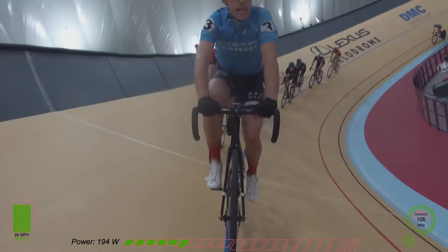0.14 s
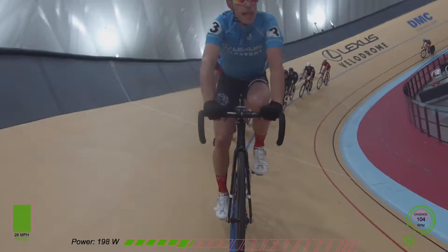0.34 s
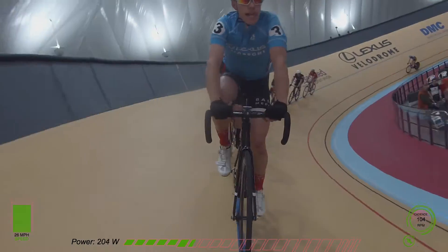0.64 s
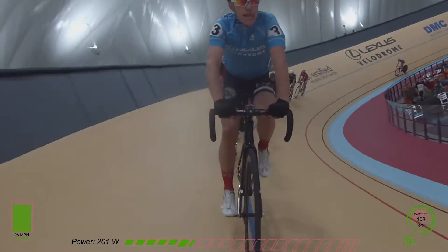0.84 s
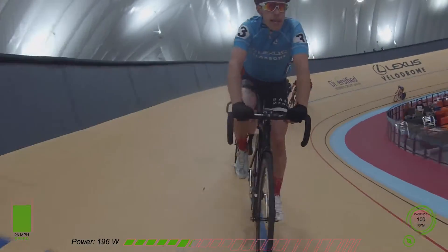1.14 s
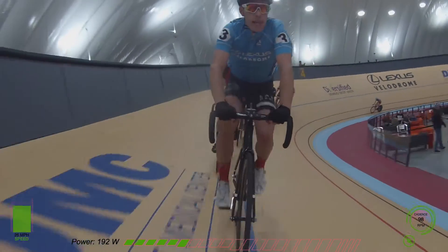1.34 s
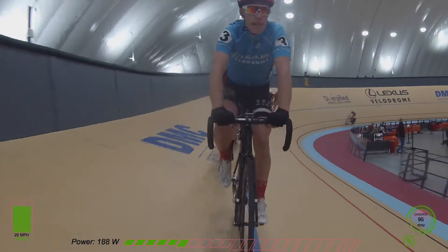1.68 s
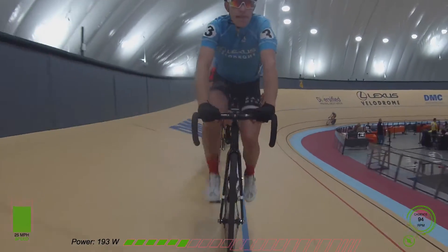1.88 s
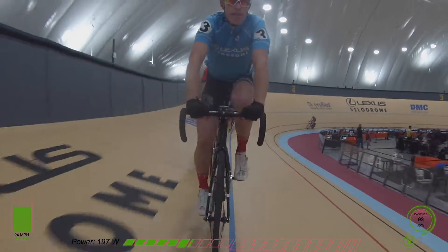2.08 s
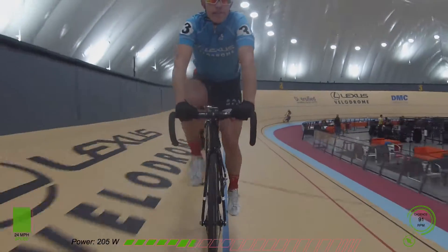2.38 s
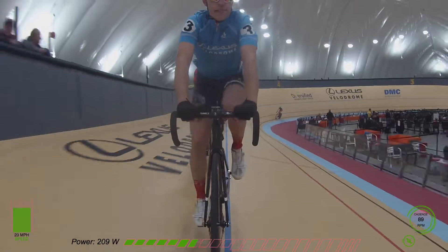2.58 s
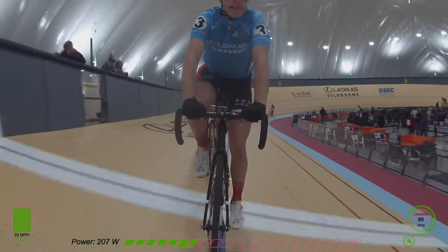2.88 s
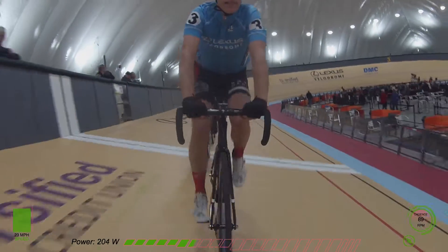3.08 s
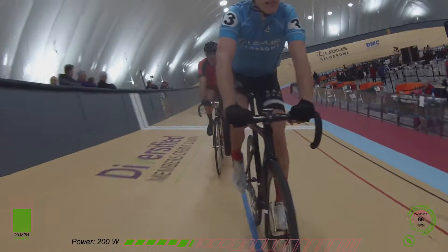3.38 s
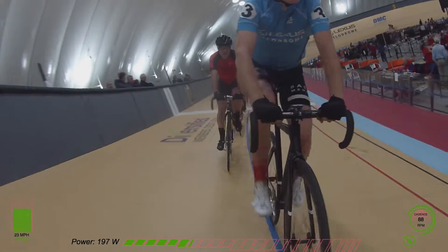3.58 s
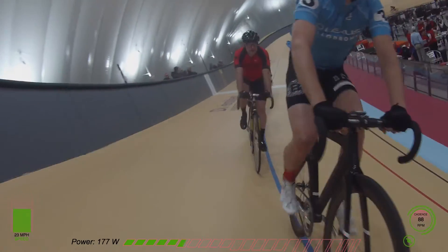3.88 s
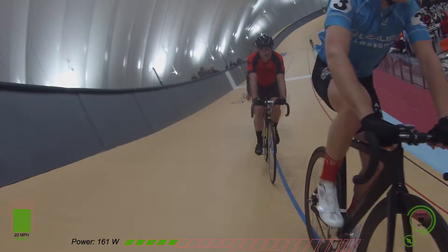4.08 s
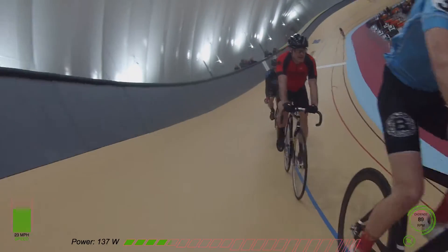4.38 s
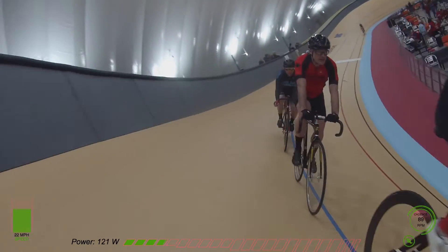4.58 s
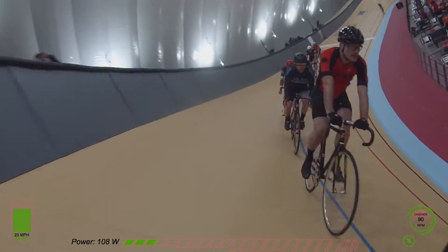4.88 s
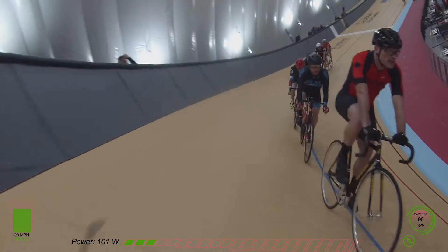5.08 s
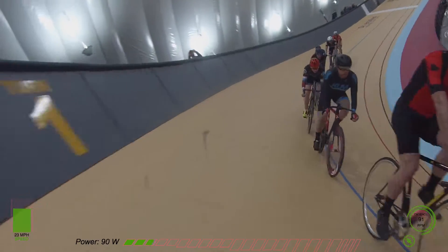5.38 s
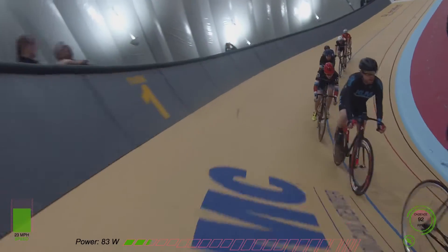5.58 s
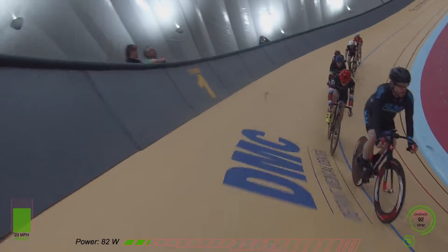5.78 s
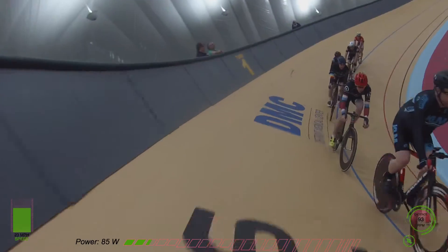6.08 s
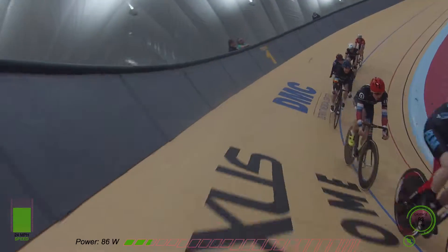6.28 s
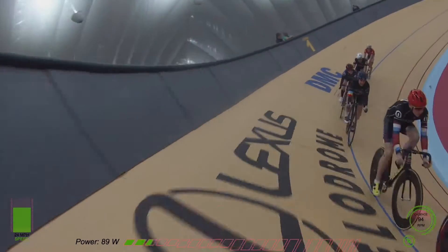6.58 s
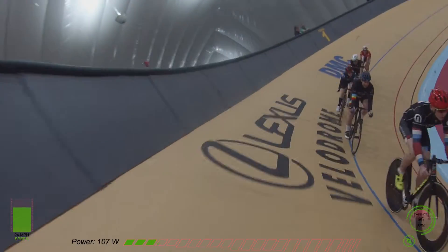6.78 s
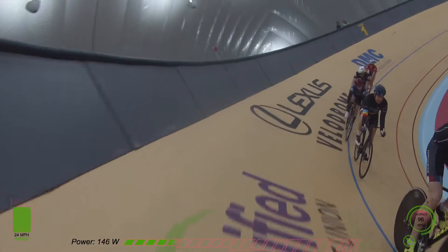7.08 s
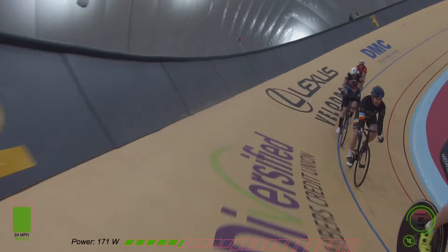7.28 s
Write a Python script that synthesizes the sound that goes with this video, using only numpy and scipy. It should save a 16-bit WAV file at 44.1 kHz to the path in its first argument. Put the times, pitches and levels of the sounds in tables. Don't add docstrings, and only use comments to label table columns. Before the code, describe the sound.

Close to a track bike's frame, rapid chain links ring in a rough buzz that slowly drops, under buffeting wind and steady tyre roar.

```python
import sys
import numpy as np
from scipy import signal
from scipy.fft import rfft, irfft, next_fast_len
from scipy.io import wavfile
from scipy.ndimage import uniform_filter1d, minimum_filter1d, map_coordinates

SR = 44100
rng = np.random.default_rng(int(sys.argv[2]) if len(sys.argv) > 2 else 0)


def log_audio(samples):
    frames = np.atleast_2d(samples).T
    limited = np.clip(frames, -1, 1)
    pcm = np.round(limited * 32767).astype(np.int16)
    wavfile.write(sys.argv[1], SR, pcm)


def boost(x):
    u = np.asarray(x, float) / 20
    return 10 ** u


N = 328545

# (frequency [Hz], level per Hz [dB])
TYRE_ROAR = [(250, -13.5), (500, -6), (800, -0.5), (1040, -1), (1200, -7), (1500, -10), (3000, -20),
             (8000, -39), (15000, -70)]
# (frequency [Hz], level per Hz [dB])
WIND_BUFFET = [(9, -39), (15, -2), (43, 0.5), (95, -0.5), (150, -9), (260, -23.5), (600, -80)]
# (frequency [Hz], level per Hz [dB])
WIND_FLUTTER = [(60, -45), (130, 0), (220, -4.5), (350, -11.5), (550, -17), (900, -28.5), (2000, -70)]
# (time [s], half length [s], buffet rise [dB], flutter rise [dB])
LEG_GUSTS = [(0.21, 0.075, 5.5, 6.5), (0.52, 0.021, 9, -3.5), (0.624, 0.018, -5, 10),
             (0.87, 0.11, 9.5, 10.0), (1.075, 0.19, 4, 7), (1.474, 0.029, 3, 4.2), (1.583, 0.051, 8, -2.5),
             (1.708, 0.038, 7, 8.5), (1.976, 0.077, 6, 8), (2.316, 0.088, 5.7, 6.5),
             (2.53, 0.078, 7.5, 9.8), (2.75, 0.057, 10, 4), (2.9, 0.06, 7, 11.5), (3.059, 0.021, 10, 5),
             (3.203, 0.17, 5.5, 7.5), (3.435, 0.038, 10.5, 2), (3.695, 0.15, 6, 8), (4.06, 0.042, 7.5, 4),
             (4.304, 0.067, 8.5, 7.5), (4.703, 0.049, 5, 10.5), (4.764, 0.011, 2, 9),
             (4.934, 0.13, 9.5, 8.5), (5.325, 0.047, 5, 2), (5.576, 0.031, -1, 2), (5.687, 0.025, -3, 4.5),
             (5.96, 0.058, 7, 8.5), (6.446, 0.03, 8, 1), (6.73, 0.13, 2.7, 4.5), (6.962, 0.071, 3, 2.5),
             (7.438, 0.047, 6.5, 0.5)]
# (time [s], half length [s], drop [dB])
WIND_LULLS = [(0.084, 0.1, 2.2), (0.414, 0.045, 4.9), (0.965, 0.026, 9), (1.9, 0.034, 3.1),
              (2.198, 0.022, 1), (2.59, 0.031, 2), (3.28, 0.066, 6), (3.585, 0.043, 5.5), (3.848, 0.025, 1),
              (4.27, 0.021, 12), (4.54, 0.067, 5), (4.851, 0.079, 8.5), (5.09, 0.021, 8),
              (5.203, 0.025, 3.6), (6.151, 0.068, 1), (6.758, 0.039, 4.5), (7.287, 0.016, 2)]
# (time [s], peak [dB], thump over peak [dB])
SHARP_PUFFS = [(0.193, -14, 7), (0.233, -9, -10), (0.293, -15, 3), (0.602, -13, -2), (0.789, -17, -6),
               (0.822, -6, -1), (0.884, -9, -1), (1.074, -9, -5), (1.39, -14.5, -14), (1.451, -12.5, 0),
               (1.535, -12, -1), (1.988, -11, -12), (2.467, -5.5, 3.5), (2.538, -11.5, 1),
               (2.659, -12, -12), (2.877, -29, 0), (2.919, -8.5, 7.5), (3.081, -27, -8), (3.127, -9, -13),
               (3.2, -7.5, -4), (3.434, -13, -20), (3.738, -13, 1), (4.19, -22, 7), (4.297, -15, -6),
               (4.758, -18, 14), (4.916, -10.5, 0.5), (5.225, -16.5, 2), (5.525, -20, -11),
               (6.307, -14, -4), (6.462, -16.5, 6)]
# (frequency [Hz], level [dB])
PUFF_AIR = [(80, -3), (200, 2.0), (400, 0.5), (900, -5.5), (1300, -25.0), (3000, -54)]
# (time [s], peak [dB], frequency [Hz], time to fade 60 dB [s])
CLAMP_KNOCKS = [
    (2.0585, -16, 3000, .045),
    (4.536, -15, 2500, .02),
    (7.0167, -9, 2500, .011),
    (7.0172, -13, 3150, .011),
]
# (time [s], links passed [count])
CHAIN_TRAVEL = [(0.0, -0.47), (0.45, 38.1), (1.05, 90.37), (1.8, 156.88), (2.4, 209.6), (3.0, 262.02),
                (3.6, 313.73), (4.05, 351.83), (4.2, 364.08), (4.35, 376.11), (4.8, 411.79), (5.4, 457.67),
                (5.85, 490.69), (6.0, 501.97), (6.75, 557.05), (6.9, 567.8), (7.2, 590.16), (7.45, 609.09)]
# (time [s], rollers peak [dB], frame peak [dB], mount peak [dB])
HARD_LINKS = [(0.0145, -30, -19.5, -22), (0.4348, -27, -17, -19), (0.5275, -27, -13, -33),
              (0.79, -27, -15, -17.5), (1.1796, -26, -12, -19.5), (1.224, -25.5, -26, -19),
              (1.3705, -29, -19, -20), (1.6888, -26, -16, -19), (1.745, -30, -13, -21),
              (1.8096, -33, -13, -17), (1.971, -28, -21, -19), (2.051, -33, -11, -20),
              (2.1893, -30, -16, -20), (2.381, -30, -21, -18.5), (2.4587, -25, -21, -15.5),
              (3.4058, -29, -16, -21), (3.5896, -22, -20, -20), (3.9108, -27, -17.5, -25),
              (3.9455, -29, -12, -25), (4.2336, -29, -15.5, -24), (4.381, -29, -16, -22),
              (4.5343, -28, -15, -23), (5.1408, -28, -14, -19), (5.3364, -24, -22, -18),
              (5.5251, -29, -17, -22), (5.688, -32, -17, -20), (5.946, -33, -10.5, -18),
              (6.2452, -33, -14, -26), (6.7197, -25, -34, -24), (7.38, -25, -20, -17.5)]
# (time [s], half length [s], slack [dB], surge after it [dB])
CRANK_DEAD_SPOTS = [(0.122, 0.077, 4, 4), (0.321, 0.031, 11, 8), (0.43, 0.077, 14.5, 7),
                    (0.7, 0.05, 3.5, 3.5), (1.026, 0.029, 6, 3.5), (1.32, 0.03, 6, 1.2),
                    (1.566, 0.02, 5.2, -0.8), (1.88, 0.062, 5.5, 3.3), (2.151, 0.032, 9.5, 4.5),
                    (2.423, 0.065, 3.5, 0.5), (2.565, 0.046, 12, 8.5), (2.718, 0.079, 11.5, 10),
                    (3.06, 0.029, 7, 2.2), (3.382, 0.015, 4, 4.5), (3.548, 0.05, 6.5, 3),
                    (3.87, 0.022, 10, 2), (4.15, 0.044, 2.5, 0), (4.468, 0.038, 8, 3),
                    (4.78, 0.054, 4, 2.5), (4.899, 0.011, 11, -1), (5.1, 0.03, 4.9, 0),
                    (5.442, 0.051, 4.5, 0.5), (5.733, 0.037, 8.5, -1), (6.055, 0.052, 9, -3),
                    (6.277, 0.062, 3.5, 2.2), (6.476, 0.12, 5, 1), (6.785, 0.053, 6, 1.5),
                    (7.09, 0.06, 7.5, -0.5), (7.26, 0.08, 3, 2.3)]
# (frequency [Hz], width [Hz], level [dB])
FRAME_TUBES = [(1696, 85, -5), (1895.8, 31.5, 5.5), (2109, 53, 2), (2198, 226, -5)]
# (frequency [Hz], width [Hz], level [dB])
CAMERA_MOUNT = [(2676, 94, 0.5), (3132, 62, -0.5), (3316, 61, -4), (3818, 150, 1.5), (4176, 107, 1.5),
                (4454, 55, -1), (4720, 133, -7), (4964, 130, -7), (5330, 39, -7.5), (5520, 155, -11.5),
                (5950, 54, -8), (6190, 69, -6), (7020, 160, -17.5), (7640, 100, -18.5)]
# (frequency [Hz], width [Hz], level [dB])
CHAIN_ROLLERS = [(8410, 86, 7.5), (8820, 210, 11), (9700, 210, 3), (10020, 108, 11.5), (10650, 120, -4)]
# (frequency [Hz], width [Hz], level [dB])
CHAIN_PINS = [(11000, 400, -2), (11830, 100, 2), (12170, 130, 5), (12520, 90, 9), (12950, 150, 5),
              (13450, 300, 0), (14450, 400, -1), (14900, 300, 3)]
# (frequency [Hz], level [dB])
MIC_PORT = [(20, -1), (5000, 0.5), (9000, -2.5), (10500, -5.5), (12500, -12.5), (13900, -21), (15500, -31)]
# (time [s], gain [dB])
AUTO_GAIN = [(0.0, 1.5), (0.8, -0.7), (0.92, -4.5), (1.07, -4), (1.37, 1.04), (2.07, -0.6), (2.52, 0.2),
             (2.57, -7.5), (2.77, -7), (3.07, -3), (3.77, -1), (4.09, 1.8), (4.67, -0.05), (5.09, -2.5),
             (5.5, 2.1), (5.97, 2.6), (6.27, 1.1), (7.45, 1.5)]


def unit(x):
    return x / np.sqrt(np.mean(x ** 2) + 1e-20)


def along(points, hz):
    f, v = np.transpose(points)
    return np.interp(np.log(hz + 1), np.log(f + 1), v)


def wobble(rate):
    points = rng.standard_normal(int(N * rate / SR) + 4)
    return map_coordinates(points, [np.arange(N) * rate / SR])


def filtered(x, response):
    m = next_fast_len(N + SR // 2)
    return irfft(rfft(x, m) * response(np.fft.rfftfreq(m, 1 / SR)), m)[..., :N]


def noise(spectrum):
    return unit(filtered(rng.standard_normal(N), lambda hz: boost(along(spectrum, hz))))


def ringing(x, modes):
    def body(f):
        total = 0
        for k, (centre, width, db) in enumerate(modes):
            damping = 1j * f * width
            total = total + (-1) ** k * boost(db) * damping / (centre ** 2 - f ** 2 + damping)
        return total
    return unit(filtered(x, body))


def bell(t, length):
    return np.exp(-(t / length) ** 2)


def summed(shape, at, db):
    t = np.arange(0, N / SR, 1 / 1000)
    return np.interp(np.arange(N) / SR, t, shape(t[:, None] - at) @ db)


def gusts():
    s, length, buffet_db, flutter_db = np.transpose(LEG_GUSTS)
    lull_s, lull_length, lull_db = np.transpose(WIND_LULLS)
    lull = summed(lambda t: bell(t, lull_length), lull_s, lull_db)
    buffet_swing = summed(lambda t: bell(t, length), s, buffet_db) - lull
    flutter_swing = summed(lambda t: bell(t, length), s, flutter_db) - lull
    return buffet_swing, flutter_swing


def tyres(flutter_swing, eddy):
    roar = unit(boost(0.15 * eddy + 1.8 * wobble(40)) * noise(TYRE_ROAR))
    level_db = -29 + 0.31 * np.maximum(flutter_swing, 0)
    return boost(level_db + 0.02) * roar


def wind(buffet_swing, flutter_swing, eddy):
    buffet = unit(boost(0.6 * eddy + 1.0 * wobble(30)) * noise(WIND_BUFFET))
    flutter = unit(boost(2.65 * eddy + 1.33 * wobble(35)) * noise(WIND_FLUTTER))
    buffet_db, flutter_db = -19 + buffet_swing, -27 + flutter_swing
    return boost(buffet_db + 0.6) * buffet + boost(flutter_db + 1.0) * flutter


def puffs():
    swell, push = np.zeros(N + SR), np.zeros(N + SR)
    t = np.arange(SR // 10) / SR
    sides = np.sign(rng.standard_normal(len(SHARP_PUFFS)))
    for (s, db, thump_db), side in zip(SHARP_PUFFS, sides):
        start = round(s * SR)
        thump = np.sin(2 * np.pi * 85 * t) * bell(t, 0.012)
        swell[start:][:len(t)] += boost(db - 6.5) * t / 0.0086 * np.exp(1 - t / 0.0078)
        push[start:][:len(t)] += side * boost(db + thump_db + 3.5) * thump
    return swell[:N] * noise(PUFF_AIR) + push[:N]


def knocks():
    out = np.zeros(N + SR)
    t = np.arange(SR // 20) / SR
    bent_time = t + 0.00015 * (1 - np.exp(-t / 0.002))
    for s, db, hz, t60 in CLAMP_KNOCKS:
        strength = boost(db - 60 * t / t60) * (1 - np.exp(-t / 0.0006))
        out[round(s * SR):][:len(t)] += strength * np.sin(2 * np.pi * hz * bent_time)
    return out[:N]


def pull():
    s, length, slack_db, surge_db = np.transpose(CRANK_DEAD_SPOTS)

    def surge(t):
        after = np.maximum(t, 0) / 0.046
        return after * np.exp(1 - after)

    return summed(surge, s, surge_db) - summed(lambda t: bell(t, length), s, slack_db)


def blows(spot, hard, db, hard_db, load_db):
    db = np.where(np.isin(np.arange(len(spot)), hard), 0, db)
    db[hard] = hard_db - load_db[spot[hard]]
    return np.bincount(spot, boost(db), N)[:N]


def scrape(clicks, rise, life, slide_db, tap_db):
    t = np.arange(SR // 40) / SR
    burst = signal.fftconvolve(clicks, (1 - np.exp(-t / rise)) * np.exp(-t / life))[:N]
    rough = rng.standard_normal(N)
    contact = (unit(np.abs(burst)) + boost(slide_db)) * rough
    return contact + boost(tap_db) * unit(clicks) * np.sign(rough)


def chain(flutter_swing):
    load_db = pull()
    frame_db = -26.5 + load_db
    mount_db = -31.5 + 0.55 * load_db + 0.05 * flutter_swing
    roller_db = -47 + 0.77 * load_db

    at, passed = np.transpose(CHAIN_TRAVEL)
    link = np.arange(int(passed[-1]) + 1)
    luck = rng.standard_normal((len(link), 4))
    when = np.interp(link - 0.2, passed, at) + 0.00076 * luck[:, 0]
    hard_s, hard_roller_db, hard_frame_db, hard_mount_db = np.transpose(HARD_LINKS)
    hard = np.abs(when[:, None] - hard_s).argmin(axis=0)
    when[hard] = hard_s
    spot = (when * SR).astype(int)
    force = np.clip(luck[:, 1], -3, 1.2)

    tube_db = 1.6 * force + 1.1 * luck[:, 2]
    tube_blows = blows(spot, hard, tube_db, hard_frame_db - 4.5, frame_db)
    frame = scrape(tube_blows, rise=0.00012, life=0.0033, slide_db=-5.5, tap_db=-12.0)
    tubes = boost(frame_db + 0.36) * ringing(frame, FRAME_TUBES)

    clamp_db = 2.4 * force + 1.4 * luck[:, 3]
    clamp_blows = blows(spot, hard, clamp_db, hard_mount_db - 6.0, mount_db)
    mount = scrape(clamp_blows, rise=0.00047, life=0.0049, slide_db=-12, tap_db=-15)
    housing = boost(mount_db + 0.55) * ringing(mount, CAMERA_MOUNT)

    seating = blows(spot, hard, 3.6 * force, hard_roller_db - 10.0, roller_db)
    roller_hits = scrape(seating, rise=0.0001, life=0.0012, slide_db=-8.5, tap_db=-26)
    pin_hits = scrape(seating, rise=0.0002, life=0.0018, slide_db=-2, tap_db=-12)
    small_parts = ringing(roller_hits, CHAIN_ROLLERS) + boost(-7.5) * ringing(pin_hits, CHAIN_PINS)
    return tubes + housing + boost(roller_db + 4) * small_parts


def scene():
    buffet_swing, flutter_swing = gusts()
    eddy = wobble(16)
    background = tyres(flutter_swing, eddy) + wind(buffet_swing, flutter_swing, eddy)
    return (background + puffs() + knocks() + chain(flutter_swing))[None]


def band_limit(x):
    return signal.sosfilt(signal.butter(12, 15120, fs=SR, output="sos"), x)


def record(dry):
    s, gain_db = np.transpose(AUTO_GAIN)
    x = filtered(dry, lambda hz: boost(along(MIC_PORT, hz)))
    x = x * boost(np.interp(np.arange(N) / SR, s, gain_db))
    needed = np.minimum(1, 0.92 / (np.abs(x) + 1e-9))
    limiter = uniform_filter1d(minimum_filter1d(needed, size=801), size=600)
    return band_limit(x * limiter)


dry = scene()
out = record(dry)
log_audio(out)
```